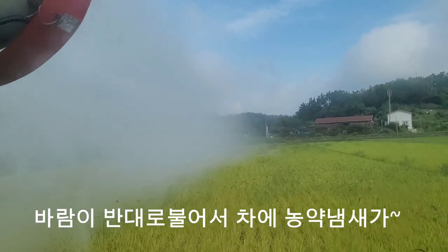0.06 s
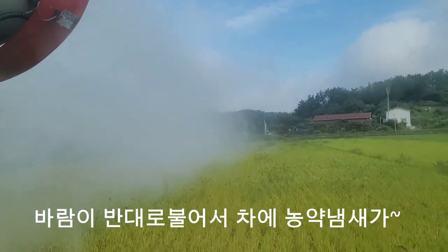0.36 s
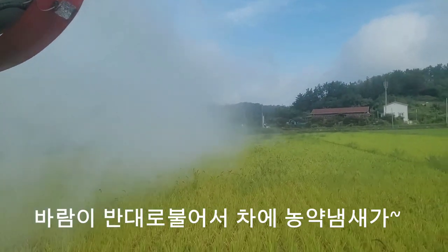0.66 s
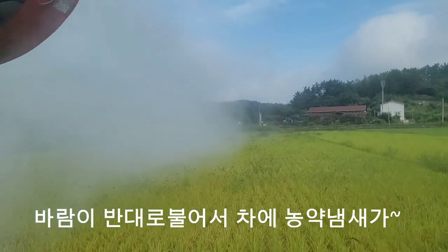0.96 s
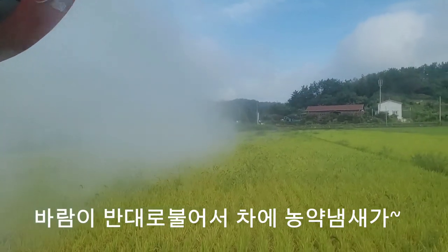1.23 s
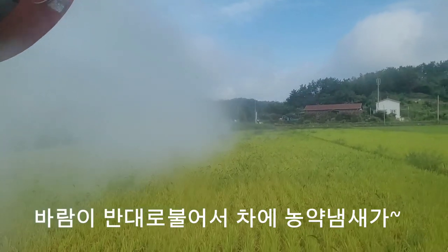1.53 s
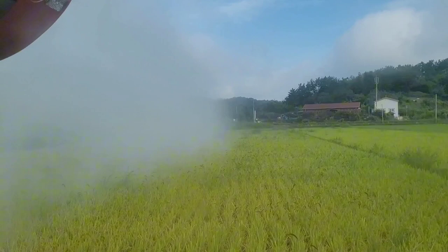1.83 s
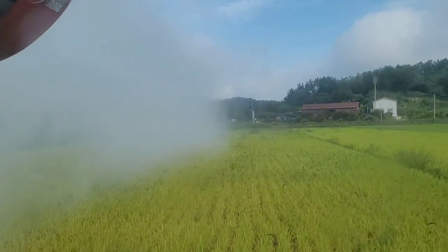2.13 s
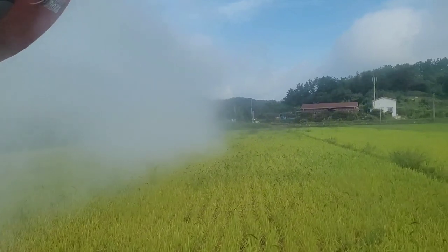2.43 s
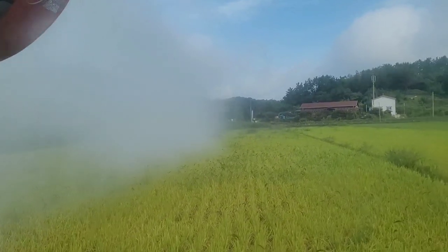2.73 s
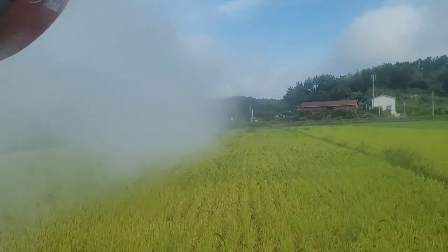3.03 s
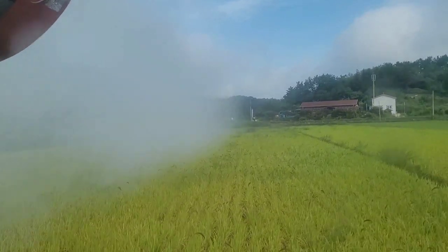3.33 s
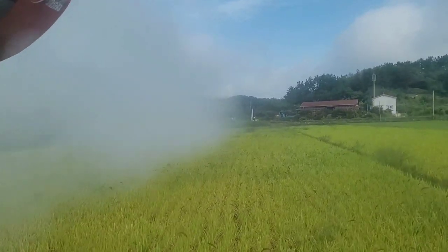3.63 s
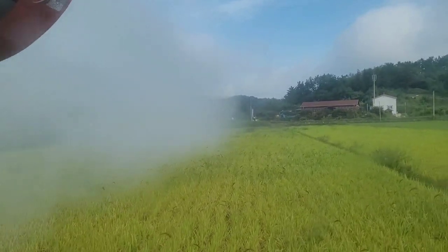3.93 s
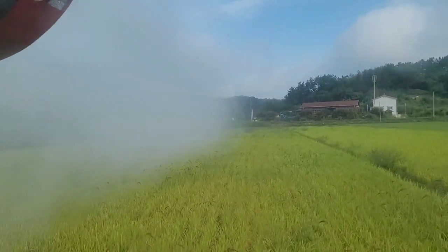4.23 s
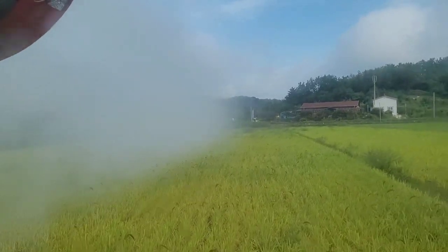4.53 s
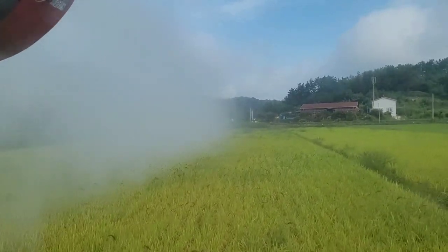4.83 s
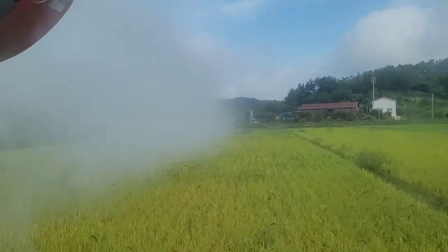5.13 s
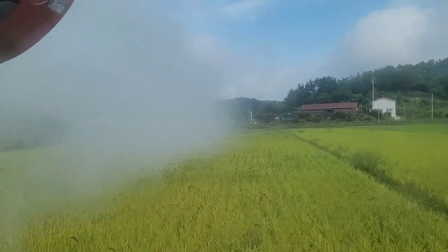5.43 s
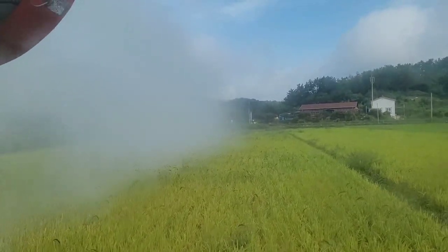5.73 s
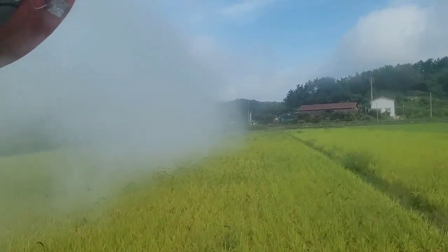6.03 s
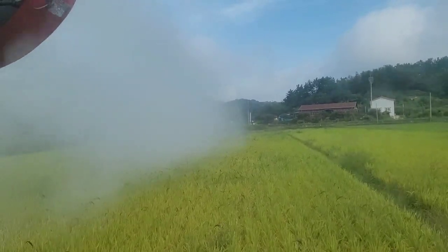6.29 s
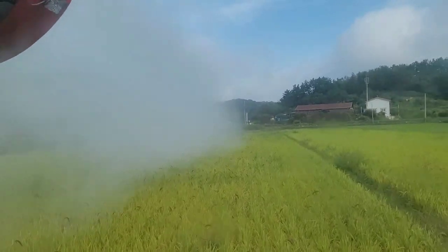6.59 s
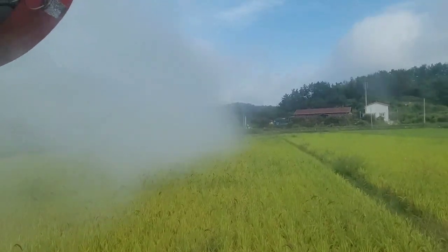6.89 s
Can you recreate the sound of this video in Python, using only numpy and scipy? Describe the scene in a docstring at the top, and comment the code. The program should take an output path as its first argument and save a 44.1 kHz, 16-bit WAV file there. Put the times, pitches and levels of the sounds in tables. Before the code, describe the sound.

A mist blower runs flat out, heard in stereo from the cab of a truck creeping along a field. Its fan holds a loud, steady drone over engine throb, wavering gear whine and an air jet rushing on the left. The cab rumbles and booms softly with the track. Two light brushing hisses and faint squeaks pass on the left, then two bumps shake the panels and a dry knock on plastic trim comes near the end.

```python
"""In the cab of a truck creeping along a field, stereo microphones, its mist blower running flat out.
From the start the fan's blades drone over engine throb, gear whine and the air jet off to the left,
and the cab booms at each jolt of the track. Near 2 s something brushes by with a hiss, a faint squeak
and a tick; near 4 s the throb surges, with another squeak. A second brush comes at 5.6 s, two bumps
shake the panels, and just before 7 s a knock rings the plastic trim."""
import sys
import numpy as np
from scipy import signal
from scipy.fft import rfft, irfft
from scipy.io import wavfile

SR = 44100
rng = np.random.default_rng(int(sys.argv[2]) if len(sys.argv) > 2 else 0)


def store_pcm(level_fs):
    """Save levels as 16-bit WAV."""
    pcm = np.round(np.clip(level_fs, -1, 1) * 32767).astype(np.int16)
    wavfile.write(sys.argv[1], SR, np.atleast_2d(pcm).T)


N = 315426
T = np.arange(N) / SR
HZ = np.maximum(np.arange(N // 2 + 1) * SR / N, 1)
OPPOSITE_PHASE = np.array([[1], [-1]])  # how the short waves of high tones meet the two microphones


def undb(db):
    """Decibels to gain."""
    return 10 ** (np.asarray(db) / 20)


def unit(x):
    """Scale to rms 1."""
    return x / np.sqrt(np.mean(np.abs(x) ** 2))


def curves(table):
    """Each column after the first as a control over time."""
    s, *columns = np.transpose(table)
    return [np.interp(T, s, column) for column in columns]


def swell(s, width_s):
    """A smooth rise and fall around a moment."""
    return np.exp(-((T - s) / width_s) ** 2)


def walk(rate_hz):
    """Smooth random wander of spread 1."""
    return unit(irfft(rfft(rng.standard_normal(N)) / (1 + (HZ / rate_hz) ** 4), N))


def colour(hz, db):
    """Gain at every frequency from a few points."""
    return undb(np.interp(np.log(HZ), np.log(hz), db))


def resonant(modes):
    """Gain at every frequency from a few resonance peaks."""
    return undb(sum(db / (1 + (2 * (HZ - hz) / width) ** 2) for hz, width, db in modes))


def noise(gain):
    """Noise with the given amplitude per root Hz."""
    return irfft(rfft(rng.standard_normal(N)) * gain, N) * np.sqrt(SR / 2)


def tone(phase, waver, rate_hz):
    """A tone of rms 1 whose size and phase shake at random."""
    shake = 1 + waver * (walk(rate_hz) + 1j * walk(rate_hz))
    return unit(np.real(shake * np.exp(1j * phase)))


def pan(db):
    """Microphone gains for a sound this much louder on the left."""
    return undb(np.array([[db], [-db]]) / 2)


def bass_at_mics(x, lag_s=0.00036):
    """A low sound reaches the right microphone a little later and stronger."""
    return np.array([x, np.interp(T - lag_s, T, x)]) * pan(db=-.5)


# The panels around the microphones. Each row: frequency in Hz, noise density in dB before shaping.
PANEL_SPECTRUM = [(12, -66), (40, -44.5), (70, -47.5), (105, -49.5), (160, -47), (215, -44.5), (300, -53.5),
                  (400, -58), (600, -64), (1200, -99)]
# Bumps that shake them. Each row: peak time in seconds, half length in seconds, rise in dB.
PANEL_BUMPS = [(5.95, .17, 2.5), (6.53, 0.11, 4.5)]


def panel_rumble(level_db=-.5, top_hz=1100, diffuse=0.08):
    """The cab's panels rumble from all sides, more at each bump."""
    spectrum = colour(*np.transpose(PANEL_SPECTRUM)) / (1 + (HZ / top_hz) ** 4)
    direct = bass_at_mics(noise(spectrum))
    scattered = diffuse * np.sqrt(2) * np.array([noise(spectrum), noise(spectrum)])
    bump_db = sum(db * swell(s, width_s) for s, width_s, db in PANEL_BUMPS)
    return (direct + scattered) * undb(level_db + bump_db)


# Jolts from the track below. Each row: peak time in seconds, half length in seconds, level in dB.
TRACK_JOLTS = [(0.758, 0.1, -24), (1.596, 0.17, -22.5), (2.14, 0.16, -23), (2.954, .12, -27.5),
               (4.76, .14, -23.5), (5.566, .08, -23.5), (6.15, 0.23, -18), (6.898, 0.17, -21)]


def cab_boom(boom_hz=26, width_hz=2.5, track_db=-30.5):
    """The cab's lowest air resonance, always stirred by the uneven track, swells with each jolt."""
    phase = 2 * np.pi * np.cumsum(boom_hz + width_hz / 2 * walk(rate_hz=3.4)) / SR
    jolts = [undb(db) * swell(s, width_s) for s, width_s, db in TRACK_JOLTS]
    unevenness = undb(track_db) * unit(np.hypot(walk(rate_hz=2.5), walk(rate_hz=3.8)))
    envelope = np.linalg.norm(jolts + [unevenness], axis=0)
    return bass_at_mics(np.sqrt(2) * envelope * np.sin(phase))


def cab_reflections(wet=.17, decay_s=.02):
    """Response of the direct path plus weak, quickly dying echoes off the nearby cab walls."""
    echoes = rng.standard_normal(N) * np.exp(-T / decay_s)
    return unit(1 + wet * unit(rfft(echoes)))


# The jet, outside to the left. Each row: frequency in Hz, left and right density in dB before shaping.
JET_SPECTRUM = [(388, -54.5, -59), (684, -58, -61), (985, -62.5, -66.5), (1203, -64.5, -68),
                (1590, -71.5, -78), (1970, -72.5, -77.5), (2700, -78, -84.5), (3100, -78.5, -87),
                (4250, -82, -92.5), (6180, -89.5, -103.5), (7360, -97.5, -112.2), (8200, -93, -104.8),
                (9700, -99.1, -104.1), (15500, -103.8, -122.1)]
# Cab and ducts colour it on its way in. Each row: centre in Hz, width in Hz, boost in dB.
CAB_AND_DUCT_MODES = [(370, 130, 7), (535, 13, 3), (824, 45, 1.5), (964, 31, 6.5), (1357, 30, 5),
                      (1834, 56, 3.5), (1990, 50, 4), (2090, 34, 4), (2970, 110, 2.5), (4330, 260, 2.5),
                      (5350, 180, 4.5), (6330, 250, 3.5), (8260, 270, 4.5), (10560, 700, 4),
                      (13300, 6300, 2.5)]
# Its slow drift in level. Each row: time in seconds, gain in dB.
JET_DRIFT = [(0, -1.3), (.7, -1.05), (2.3, -1.24), (3.9, -1.6), (5.4, -1.6), (6.3, -0.55), (7.15, -2.5)]


def air_jet(flutter_db=0.4, low_hz=400):
    """Turbulent air and mist, different at each microphone, fluttering as eddies leave the nozzle."""
    drift_db, = curves(JET_DRIFT)
    level = undb(drift_db + flutter_db * walk(rate_hz=29))
    low_cut = 1 / np.sqrt(1 + (low_hz / HZ) ** 4)
    path = low_cut * resonant(CAB_AND_DUCT_MODES)
    hz, *sides = np.transpose(JET_SPECTRUM)
    return level * np.array([noise(colour(hz, db) * path * cab_reflections()) for db in sides])


# Squeaks to the left. Each row: peak time and half length in seconds, pitch in Hz, dB before panning.
FAINT_SQUEAKS = [(2.003, 0.037, 12400, -72), (4.04, .075, 3125, -56)]


def squeaks(wobble=0.0023):
    """Thin squeaks, slightly unsteady in pitch."""
    run_s = np.cumsum(1 + wobble * walk(rate_hz=40)) / SR
    return pan(db=8.5) * sum(
        undb(db) * swell(s, width_s) * tone(2 * np.pi * hz * run_s, waver=.2, rate_hz=30)
        for s, width_s, hz, db in FAINT_SQUEAKS)


def stroke(start_s, length_s, build_share=0.56, release_s=.02):
    """Envelope of one stroke: pressure builds, holds and is released."""
    age = np.maximum(T - start_s, 0)
    press = np.minimum(age / (build_share * length_s), 1)
    return press * np.exp(-np.maximum(age - length_s, 0) / release_s)


# Brushing on the left. Each row: start in seconds, length in seconds, level in dB before panning.
BRUSH_STROKES = [(1.903, 0.45, -67.5), (5.588, .011, -51), (5.599, 0.24, -52.5)]
# The colour of its hiss. Each row: frequency in Hz, relative level in dB.
FRICTION_SPECTRUM = [(2500, -29), (5000, -1), (6400, 3.5), (7400, -7), (9300, -1), (9800, -5.5), (10800, 1),
                     (13000, -2.5), (15500, -9)]
# Narrow rings of the brushed surface. Each row: centre in Hz, width in Hz, boost in dB.
SURFACE_MODES = [(8350, 200, 7), (9330, 160, 5), (10400, 160, 7), (11100, 250, 0), (12400, 140, -0.5)]


def brush():
    """Light touches and a short slide make a fine, bright friction hiss."""
    strokes = [undb(db) * stroke(s, length_s) for s, length_s, db in BRUSH_STROKES]
    pressure = np.linalg.norm(strokes, axis=0)
    surface = colour(*np.transpose(FRICTION_SPECTRUM)) * resonant(SURFACE_MODES)
    hiss = np.array([unit(noise(surface)) for _ in range(2)])
    return hiss * pressure * pan(db=9)


# Knocks and ticks close by in the cab. Each row: start in seconds, strength in dB, softness in seconds.
TRIM_CONTACTS = [(2.278, -19.5, 0.0000082), (6.9609, 1, 0.000097), (6.9677, -21.5, 0.0000043)]
# The dead plastic trim they ring. Each row: frequency in Hz, relative level in dB, t60 in seconds.
TRIM_MODES = [(560, -16, .012), (1190, -16, 0.0098), (2320, -21, 0.016), (2910, -20, 0.011),
              (4450, -20.5, 0.0073), (6100, -22.5, 0.0067)]


def knocks(crack_db=-24, crack_s=0.0043):
    """Short contacts ring the trim with a dry crack; a softer contact is duller."""
    age = T[:SR // 20]
    # neighbouring modes swing in opposite directions
    ring = sum((-1) ** k * undb(db) * np.sin(2 * np.pi * hz * age) * undb(-60 * age / t60)
               for k, (hz, db, t60) in enumerate(TRIM_MODES))
    out = np.zeros((2, N))
    for s, db, soft_s in TRIM_CONTACTS:
        crack = undb(crack_db) * rng.standard_normal((2, len(age))) * np.exp(-age / crack_s)
        delay = np.exp(-2j * np.pi * HZ * s)
        push = undb(db) / (1 + 2j * np.pi * HZ * soft_s)
        out += irfft(rfft(ring + crack * pan(db=4.5), N) * push * delay, N)
    return out


# Gear mesh and shaft sidebands, heard from the cab. Each row: frequency in Hz, left and right level in dB.
GEAR_TONES = [(628, -65.5, -46.5), (739, -42.5, -59), (1120, -44.5, -45), (1110, -41.5, -46.5),
              (1154, -46, -43), (1990, -69, -60), (2140, -63, -67), (3060, -58, -65.5)]


def gear_whine(run_s):
    """Meshing gears whine in wavering tones that follow the shaft's speed."""
    whine = sum(undb([[left], [right]]) * tone(2 * np.pi * hz * run_s, waver=0.16, rate_hz=3)
                for hz, left, right in GEAR_TONES)
    return whine * OPPOSITE_PHASE


# The engine, heard from the cab. Each row: frequency in Hz, relative level in dB, waver from 0 to 1.
ENGINE_TONES = [(54.1, -5, 0.5), (82.1, 0.27, .27), (163.6, -9, 0.6)]


def engine_throb(run_s, level_db=-29, surge_db=5):
    """The engine's low tones follow the shaft's speed and surge once in level."""
    throb = sum(undb(db) * tone(2 * np.pi * hz * run_s, waver, rate_hz=4)
                for hz, db, waver in ENGINE_TONES)
    return bass_at_mics(throb * undb(level_db + surge_db * swell(s=3.94, width_s=0.16)))


# The fan at full speed. Each row: time in seconds, blade-pass rate in Hz, drone and octave level in dB.
FAN_RUN = [(0, 261.4, -13, -34.1), (0.8, 261.7, -12.5, -35.5), (1.3, 261, -12, -33.5),
           (2.1, 261.5, -13, -33.8), (3.2, 261.2, -12, -31.5), (4.2, 261.4, -13, -34.5),
           (5.25, 261.2, -12.0, -33), (6.2, 261.3, -14, -36), (6.8, 262.5, -12, -37.5),
           (7.0, 261.2, -14.5, -40)]
# Its higher overtones at the microphones. Each row: multiple of that rate, left and right level in dB.
FAN_OVERTONES = [(3, -42.5, -53), (4, -53.5, -47), (7, -59, -71)]


def fan(blade_hz, drone_db, octave_db):
    """Blades passing the housing make a nearly pure drone with weak, unsteady overtones."""
    phase = 2 * np.pi * np.cumsum(blade_hz) / SR
    inflow_db = 0.2 * walk(rate_hz=2.7)  # uneven inflow makes the drone swell and sink
    drone = undb(drone_db + inflow_db) * tone(phase, waver=0.053, rate_hz=21)
    octave = undb(octave_db) * tone(2 * phase, waver=0.034, rate_hz=15)
    upper = sum(undb([[left], [right]]) * tone(k * phase, waver=0.1, rate_hz=3.9)
                for k, left, right in FAN_OVERTONES)
    return bass_at_mics(drone + octave) + upper * OPPOSITE_PHASE


def scene():
    """From inside the cab: one shaft speed drives fan, engine and gears, over the noise of cab and jet."""
    set_hz, drone_db, octave_db = curves(FAN_RUN)
    blade_hz = set_hz + .1 * walk(rate_hz=3)  # the speed hunts a little around its setting
    run_s = np.cumsum(blade_hz / blade_hz.mean()) / SR  # a clock that keeps pace with the shaft
    machine = fan(blade_hz, drone_db, octave_db) + engine_throb(run_s) + gear_whine(run_s)
    return machine + panel_rumble() + cab_boom() + air_jet() + brush() + squeaks() + knocks()


def record(dry):
    """The sound fades in over a few milliseconds and the highest treble is cut."""
    fade_s, top_hz = .004, 15700
    fade_in = np.sin(np.pi / 2 * np.minimum(T / fade_s, 1)) ** 2
    return signal.sosfilt(signal.ellip(10, .1, 80, top_hz, fs=SR, output="sos"), dry * fade_in)


dry = scene()
out = record(dry)
store_pcm(out)
```